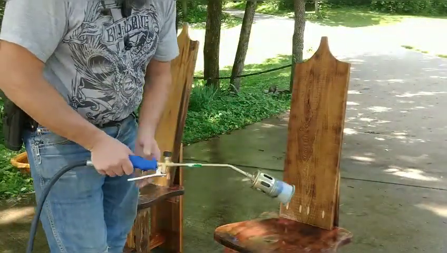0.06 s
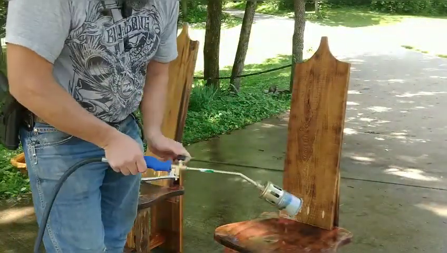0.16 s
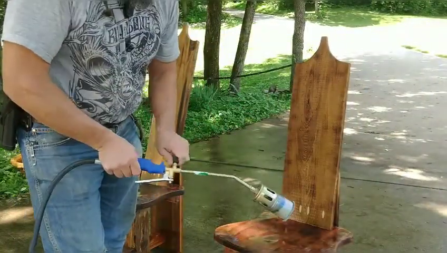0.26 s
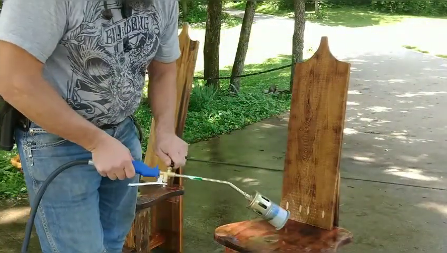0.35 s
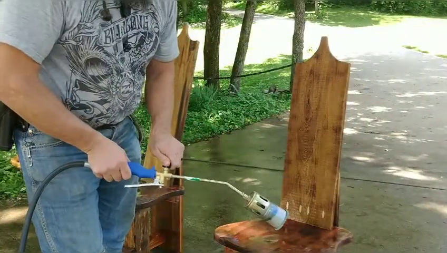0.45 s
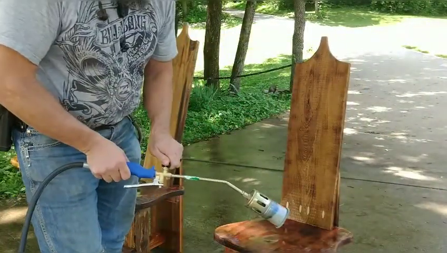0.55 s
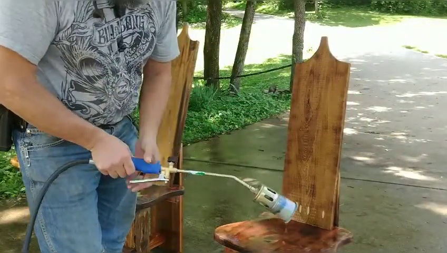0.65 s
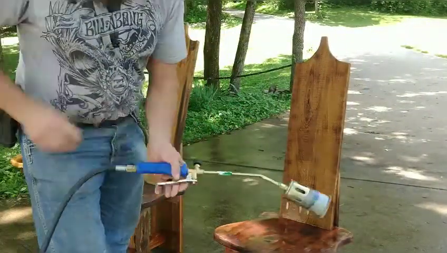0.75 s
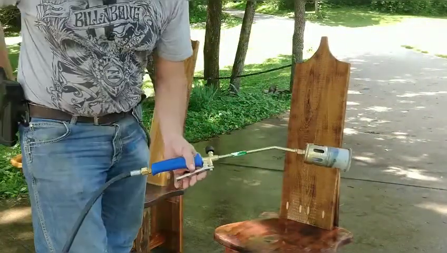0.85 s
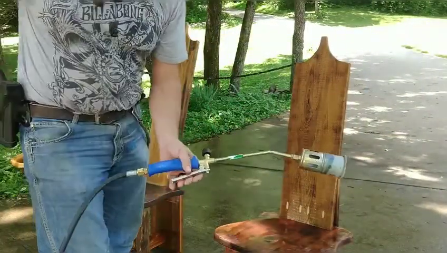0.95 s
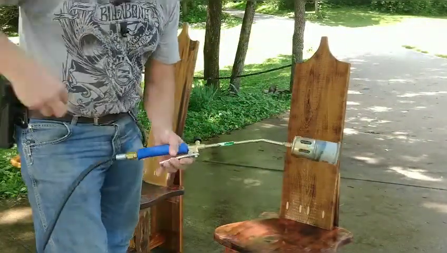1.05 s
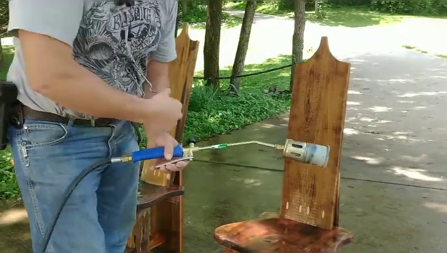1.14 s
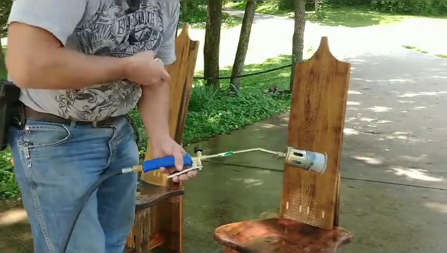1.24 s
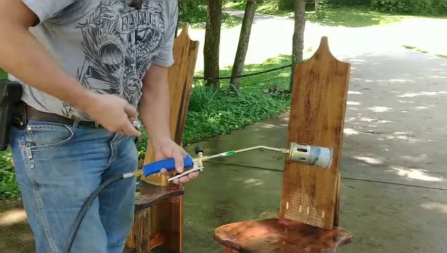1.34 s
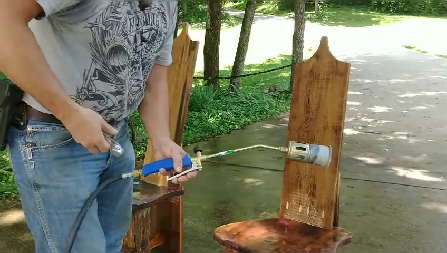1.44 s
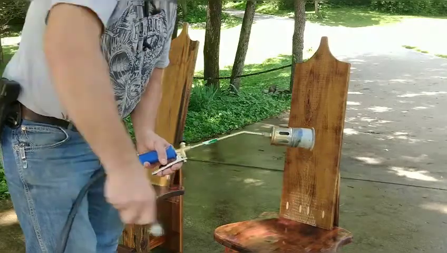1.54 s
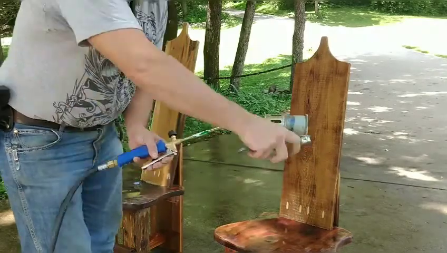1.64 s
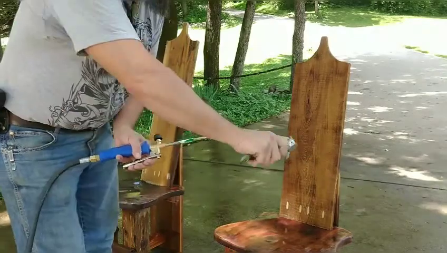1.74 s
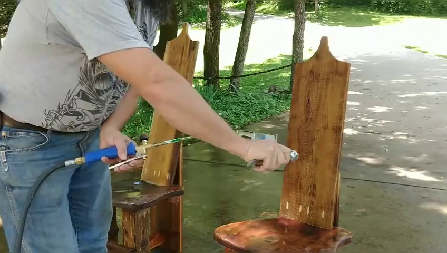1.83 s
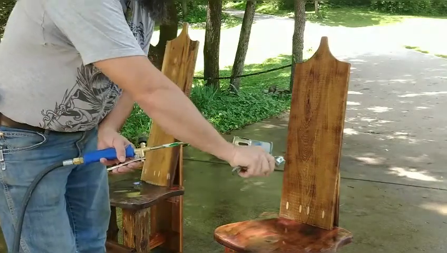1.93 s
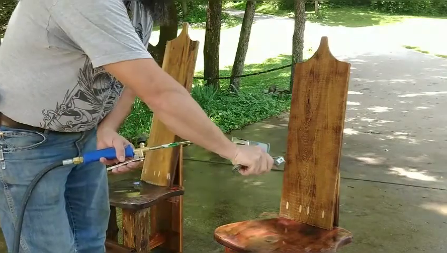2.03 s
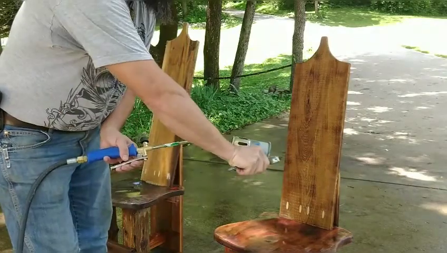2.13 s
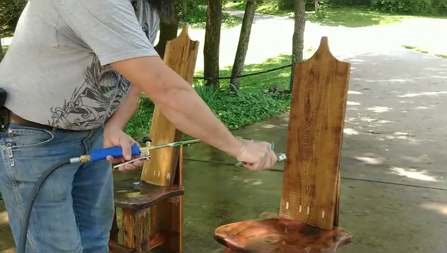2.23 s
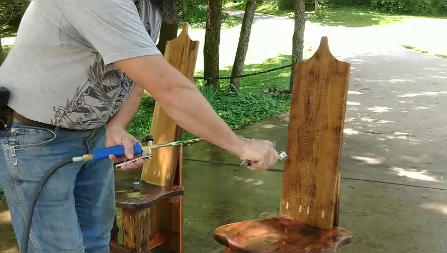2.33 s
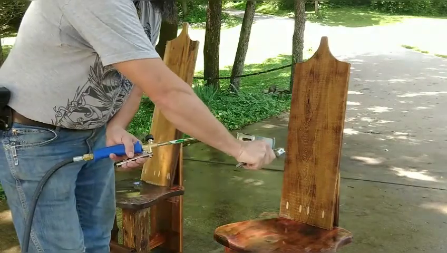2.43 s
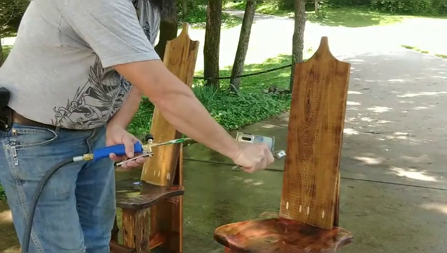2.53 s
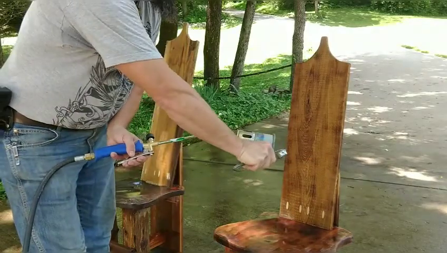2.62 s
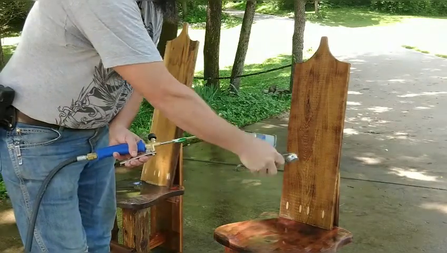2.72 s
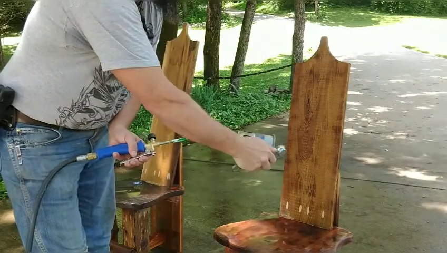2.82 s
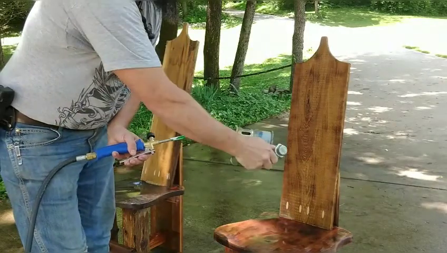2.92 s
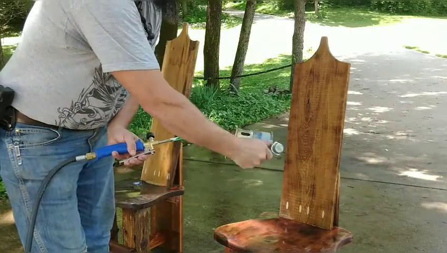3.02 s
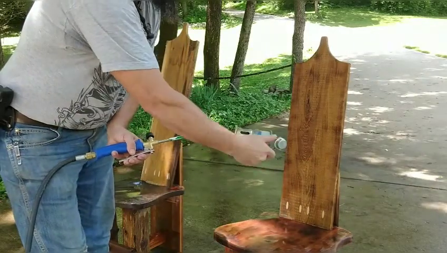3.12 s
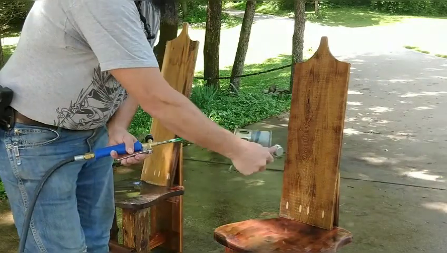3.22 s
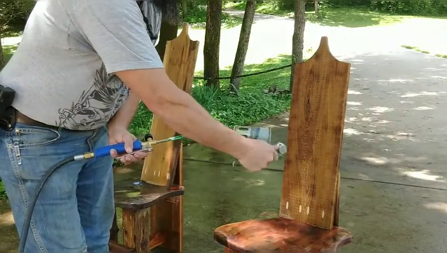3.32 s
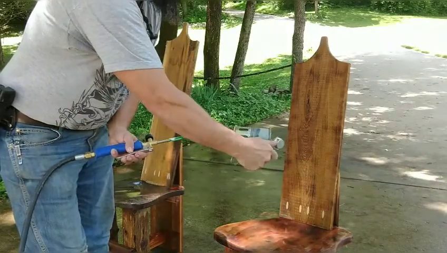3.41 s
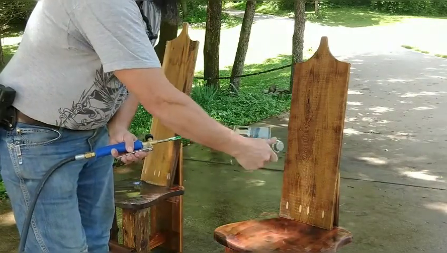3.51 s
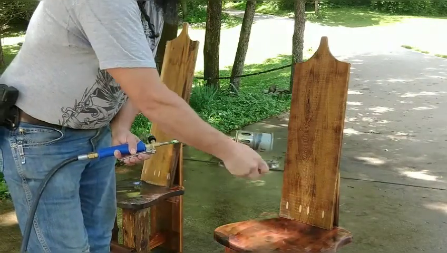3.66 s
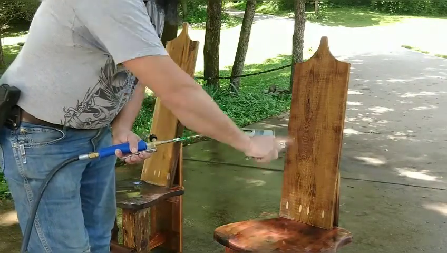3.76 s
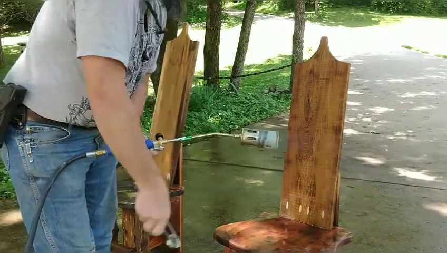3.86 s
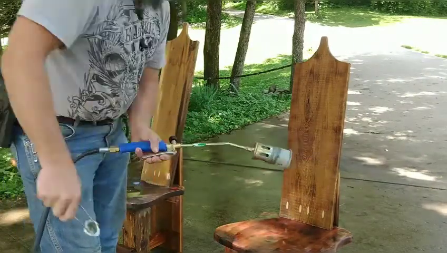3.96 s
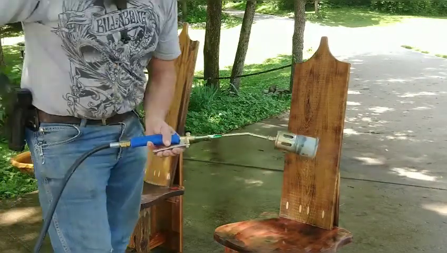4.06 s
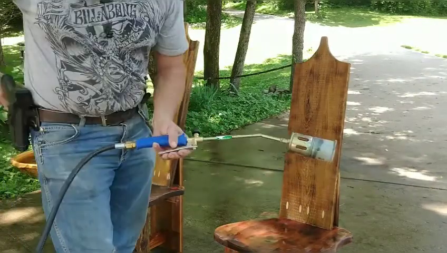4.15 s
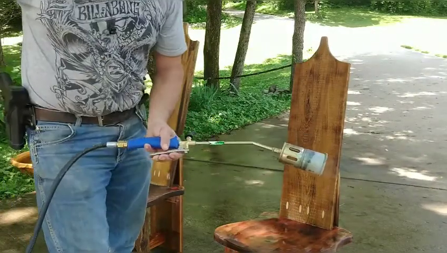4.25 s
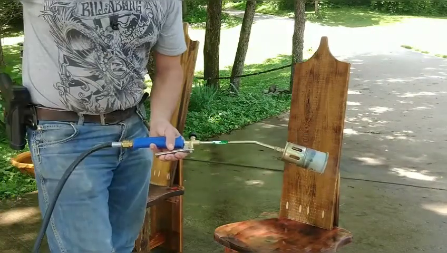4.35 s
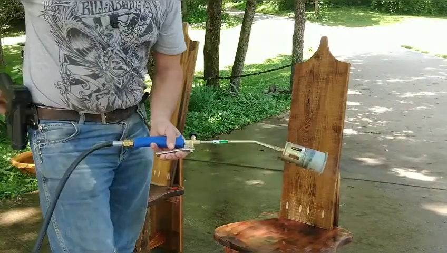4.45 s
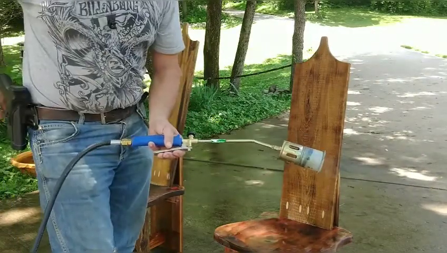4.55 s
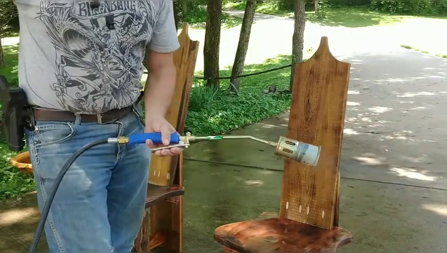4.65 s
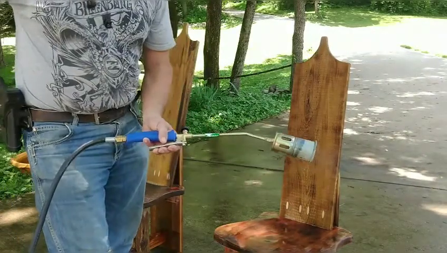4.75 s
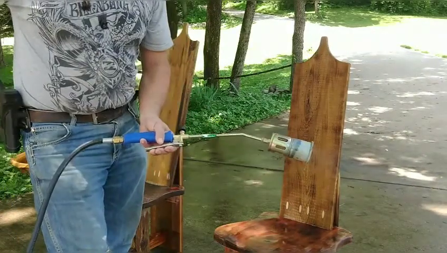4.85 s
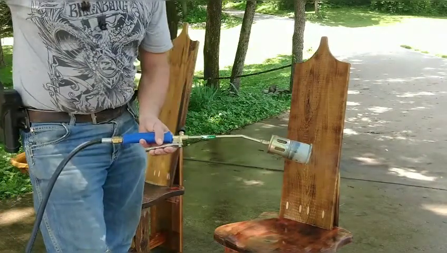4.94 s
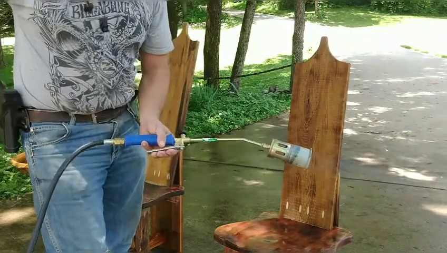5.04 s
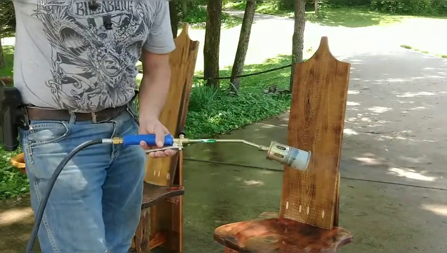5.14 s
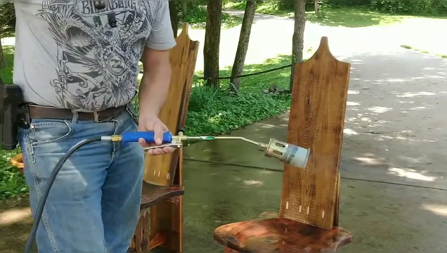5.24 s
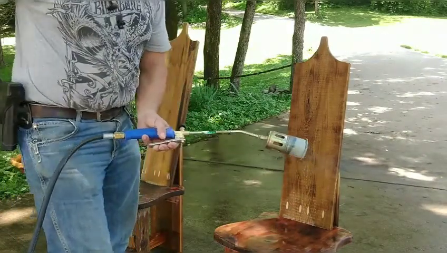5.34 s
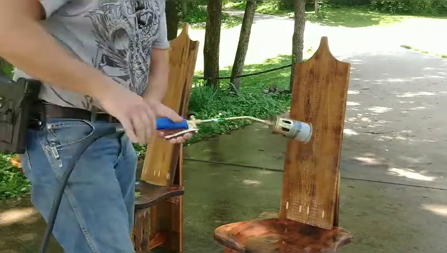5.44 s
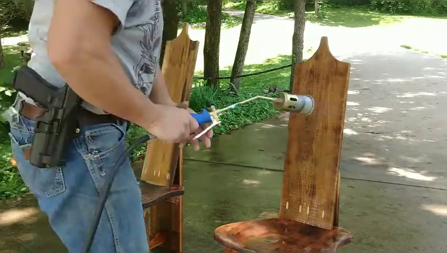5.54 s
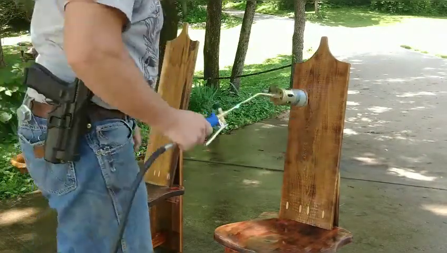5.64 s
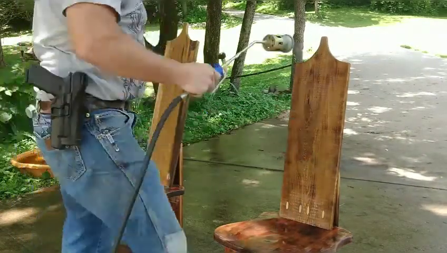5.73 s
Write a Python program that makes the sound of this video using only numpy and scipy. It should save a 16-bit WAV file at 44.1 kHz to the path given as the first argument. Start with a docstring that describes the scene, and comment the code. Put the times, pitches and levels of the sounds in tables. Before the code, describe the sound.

Close, dry outdoor sound in stereo. From 0 to 0.3 seconds a strong blast of unlit gas rushes through a burner cup, hollow and breathy around a midrange pitch, with harsh spray and low air thumps. It shuts off sharply, leaving near quiet until 0.43, when a softer flow opens with a brief spurt and settles into a steady hollow hiss with fine high sizzle. Low puffs buffet the microphone irregularly until about 1.8. From 2.18 a flint striker works: gritty drags and sharp metallic snaps near 2.2, 2.36, 2.7, 2.97, 3.43, 3.56 and 3.81, some squeaky, with a thin spring ring after 2.2 and 2.97. A tiny pop comes at 2.71. At 3.84 the gas catches; the hollow tone gives way to a low fluttering roar with brighter rush and light crackle, two stronger pops near 4.4, then steady burning, easing slightly after 5.55.

```python
"""A large propane torch, hand-held over a concrete drive. A blast of unlit gas is shut off, then a gentler flow
hisses as shaped noise and resonates in the burner cup while a flint striker is scraped: gritty bursts ring
its metal, and its spring twangs. The gas catches and burns with a roar of fluttering low noise, a brighter
rush and small pops. A sliding ground echo colours cup and flame; puffs of air buffet the microphone
over a faint open-air background."""
import sys
import numpy as np
from scipy import signal
from scipy.fft import rfft, irfft, next_fast_len
from scipy.io import wavfile
from scipy.ndimage import uniform_filter1d

SR = 44100
rng = np.random.default_rng(int(sys.argv[2]) if len(sys.argv) > 2 else 0)


def master_out(mix):
    """Clip the mix to full scale and print it as 16-bit PCM to the path in sys.argv[1]."""
    frames = np.transpose(np.atleast_2d(mix))
    ceiling = np.clip(frames, -1, 1)
    pcm = np.round(ceiling * 32767).astype(np.int16)
    wavfile.write(sys.argv[1], SR, pcm)


N = 254898
TIME, FREQS = np.arange(N) / SR, np.arange(N // 2 + 1) * SR / N

# The valve shuts, reopens, and the gas catches.
SHUT_S, OPEN_S, LIT_S = 0.3005, 0.431, 3.8355

# The opening blast: the cup swells once and falls back, while the jet sags steadily.
BLAST_CUP_DB, BLAST_SWELL_DB = -33, 3
BLAST_HISS_DB, BLAST_SIZZLE_DB, BLAST_SAG_DB_PER_S = -46, -50, 11
# The gentle flow: the cup fills up, then slowly loses level.
FILL_S, TRICKLE_CUP_DB, TRICKLE_SAG_DB_PER_S = 0.066, -38, 0.9
FIRST_SHARE = 0.053  # of its filled amplitude, as soon as the valve opens
# As the valve reopens, the sizzle rises and the hiss overshoots in a short spurt.
JET_RISE_S, SPURT_S, SPURT_LENGTH_S, SPURT_DB = .03, 0.524, 0.16, 6
# Heavy gas displaces the air in the cup, so its pitch starts sharp and sinks (shares of the pitch).
CUP_SHARP, CUP_SINK_PER_S = .018, .009
# The cup's pitch wavers as the jet flaps inside it (rms share of the pitch, rate).
CUP_WAVER, CUP_WAVER_HZ = .018, 6
# Air column of the burner cup. One row: frequency in Hz, width in Hz, relative level in dB.
CUP_AIR_COLUMN = (1365, 134, 0)
# Broad hollow tone of the cup. Each row: frequency in Hz, relative level in dB per Hz.
CUP_SPECTRUM = [(60, -44), (230, -35.5), (340, -34.5), (480, -26), (700, -17.5), (1000, -13.5),
                (1200, -5.5), (1370, 2), (1520, -2.5), (1700, -10.5), (2100, -19.5), (2800, -44),
                (4200, -46), (6000, -61.5)]
# Hiss of the gas jet. Each row: frequency in Hz, relative level in dB per Hz.
HISS_SPECTRUM = [(1500, -13.5), (3300, -9), (4300, -9.5), (5900, -19.5), (7200, -6), (7700, -6.5),
                 (8150, 7.5), (8600, 0.5), (9300, -9), (10000, -3), (10700, -1), (11500, -8.5),
                 (12100, -16), (14000, -23)]
# Topmost sizzle of the jet. Each row: frequency in Hz, relative level in dB per Hz.
SIZZLE_SPECTRUM = [(11000, -33), (12300, -17), (13000, -18), (14000, -13), (14350, -11), (14750, -9),
                   (15400, -19), (16000, -24.5)]
# Harsher spray of the blast. Each row: frequency in Hz, relative level in dB per Hz.
SPRAY_SPECTRUM = [(1200, -24), (2000, 11), (2600, 1.5), (3400, -1.5), (4400, -12), (6000, -13.5),
                  (10000, -19), (15000, -23)]
# Hiss as the torch is turned about. Each row: time in seconds, level in dB ahead of a trim.
HISS_CURVE = [(0.66, -57), (1.33, -58), (1.77, -54.5), (1.92, -57), (3.42, -58), (4.09, -54), (5.46, -56.5),
              (5.75, -57)]
# Sizzle as the torch is turned about. Each row: time in seconds, level in dB ahead of a trim.
SIZZLE_CURVE = [(0.62, -61), (0.69, -61), (1.35, -59.5), (1.72, -66), (4.15, -64.5), (4.38, -61),
                (5.41, -64), (5.75, -65)]
HISS_TRIM_DB, SIZZLE_TRIM_DB = 2.0, 4.0
# The gentle flow swells and dips in the cup. Each row: centre in seconds, length in seconds, change in dB.
CUP_GULPS = [(.535, 0.05, -3), (.84, .16, 0.5), (1.42, 0.21, 1), (1.78, .3, 1), (2.28, 0.059, -2),
             (2.57, 0.068, 3), (3.72, .14, -1)]

# The flame's rush fades once the torch is swung up and away.
RUSH_DB, LIFT_S, LIFT_FADE_DB_PER_S = -37.5, 5.56, 12
# Low roar of the flame. Each row: frequency in Hz, relative level in dB per Hz.
ROAR_SPECTRUM = [(20, -49), (45, -24), (90, -5), (170, -0.5), (220, 1), (270, -1.5), (330, -3), (400, 0.5),
                 (480, -3.5), (590, 0.5), (670, -2.5), (900, -3.5), (1200, -7), (2000, -27), (3000, -60)]
# Brighter rush of the flame. Each row: frequency in Hz, relative level in dB per Hz.
RUSH_SPECTRUM = [(600, -21), (1100, -3), (1500, 1.5), (2000, -0.5), (2400, -12), (2900, -16), (3800, -23.5),
                 (5000, -28.5), (8000, -23.5), (14000, -37)]
# The roar catches, falters and builds. Each row: time in seconds, level in dB ahead of the surges.
ROAR_CURVE = [(3.84, -32.5), (3.93, -34), (4.0, -34.5), (4.1, -34), (4.14, -31), (4.26, -31.5), (4.4, -33),
              (4.51, -30.5), (4.56, -31), (4.7, -31), (4.78, -32), (4.92, -32), (4.97, -31), (5.3, -31.5),
              (5.46, -33.5), (5.55, -31), (5.78, -35)]
# The flame flares up briefly. Each row: centre in seconds, length in seconds, rise in dB.
FLAME_SURGES = [(3.93, 0.1, 3), (4.055, 0.052, 1), (4.378, 0.18, 2.5)]
# Pockets of gas that go off with a pop. Each row: time in seconds, peak in dB ahead of the ground echo.
GAS_POPS = [(2.7128, -42.5), (4.373, -19.5), (4.402, -21)]
# Lag of the ground echo as the torch is moved. Each row: time in seconds, lag in milliseconds.
GROUND_LAG = [(0, 2.9), (.5, 2.55), (1, 3.25), (1.4, 3.1), (1.75, 3.5), (2.2, 3.12), (3.7, 3.12),
              (4.05, 3.0), (4.3, 3.28), (5.3, 3.16), (5.78, 3.33)]

SNAP_ATTACK_S, SNAP_RELEASE_S = .0005, .002
FRAME_WIDTH_HZ, SQUEAL_WIDTH_HZ = 180, 140
SPRING_HZ = 2720
# Resonances of the striker's file and hood. Each row: frequency in Hz, width in Hz, relative level in dB.
FILE_MODES = [(2900, 900, -12), (4200, 500, -12), (5300, 500, -13), (6160, 90, 1), (7000, 70, -8),
              (7900, 550, -2), (8280, 300, 0), (9190, 160, 0), (10780, 700, -10), (12400, 200, -6),
              (14000, 2500, -14)]
# The flint snaps across the file. Each row: start in seconds, length in seconds, rasp level in dB,
# clack level in dB, frame pitch in Hz as the grip shifts it, squeal level in dB, squeal pitch in Hz.
FLINT_SNAPS = [(2.1765, .008, -44, -47, 3300, -44, 6120), (2.180, .008, -54, -56, 3300, -43, 9250),
               (2.185, .008, -58, -60, 3300, -48, 6120), (2.2365, .005, -50, -39, 3470, -49, 6080),
               (2.359, .005, -60, -40.5, 3600, -54, 9200), (2.365, .0015, -54, -36, 3650, -48, 9200),
               (2.3672, .007, -48, -56, 3700, -41.5, 9200), (2.6933, .002, -49, -42, 3400, -51, 8100),
               (2.706, .012, -40, -48, 3600, -37.5, 9150), (2.973, .011, -43, -48, 3800, -43, 7020),
               (2.984, .009, -54, -48, 3800, -50, 8280), (3.4245, .003, -52, -45.5, 3780, -45, 9130),
               (3.4295, .004, -48, -40, 3800, -44, 8100), (3.558, .005, -57, -46, 3720, -60, 8250),
               (3.565, .003, -57, -48, 3720, -60, 8250), (3.809, .009, -50, -52, 3500, -55, 6160)]
# The flint drags slowly before it snaps. Each row: start in seconds, length in seconds, level in dB.
FLINT_DRAGS = [(2.295, .035, -56), (2.328, .036, -54), (2.635, .05, -56), (2.696, .013, -50.5),
               (2.908, .034, -50.5), (2.937, .036, -51.5), (3.085, .04, -56), (3.396, .032, -51),
               (3.498, .02, -57)]
# The flint jumps a tooth. Each row: time in seconds, strength in dB of the click that excites the hood.
FLINT_TICKS = [(2.1778, -30), (2.1822, -28), (2.2372, -31), (2.3672, -22), (2.6936, -30), (2.7078, -27),
               (2.7163, -29), (2.9732, -29), (2.981, -29), (3.4315, -32)]
# A tick rings the hood broadly. Each row: frequency in Hz, width in Hz, relative level in dB.
HOOD_MODES = [(3400, 900, -4), (7700, 1200, 0), (9200, 900, 0)]
# The frame rings loosely under the drags. One row: frequency in Hz, width in Hz, relative level in dB.
LOOSE_FRAME_MODE = (3400, 1000, 0)
LOOSE_FRAME_DB = -2.5
# The wire spring is plucked or jolted, and damped by the hand.
# Each row: time in seconds, level in dB, time to fall by 60 dB in seconds.
SPRING_TWANGS = [(2.202, -46.5, .62), (2.237, -56, .25), (2.694, -47, .09), (2.972, -50, .6)]

# A wavering breeze on top of a steady weak draught dies away.
BREEZE_DB, CALM_DB, CALM_S, CALMING_S = -64, -61.5, 1.85, 0.32
EDDY_HZ = 95  # eddy rate at which the puff noise plays at its own pitch
# Low noise of air on the microphone. Each row: frequency in Hz, relative level in dB per Hz.
PUFF_SPECTRUM = [(20, -20), (33, -19), (55, 1), (95, 4.5), (140, -2.5), (220, -14), (350, -24), (700, -26)]
# Puffs of air on the microphone. Each row: start in seconds, length in seconds, level in dB, eddy rate in Hz.
AIR_PUFFS = [(0.007, 0.068, -37, 94.7), (0.068, 0.059, -36.5, 185), (0.121, 0.072, -43.5, 95),
             (0.194, 0.034, -38.5, 95.2), (0.217, 0.058, -52, 85), (0.424, 0.043, -46, 80),
             (0.486, 0.033, -53, 85.2), (0.566, 0.024, -37, 159.7), (0.588, .042, -39, 119.4),
             (0.853, 0.058, -46.5, 110.5), (0.905, 0.06, -40.5, 84.8), (1.014, 0.033, -41, 115),
             (1.048, .045, -43, 89.5), (1.125, 0.023, -42, 169), (1.17, 0.046, -50, 79.6),
             (1.284, 0.031, -37.5, 95.3), (1.33, .035, -54, 100), (1.507, 0.031, -47, 101),
             (1.65, 0.062, -48, 95), (1.747, 0.052, -47.5, 95.4), (1.808, 0.053, -55, 85),
             (1.89, 0.048, -59, 80), (2.123, 0.058, -59, 80.1), (3.116, 0.077, -44.5, 99.5),
             (3.788, 0.043, -48, 75)]
# Open-air background. Each row: frequency in Hz, relative level in dB per Hz.
OUTDOORS_SPECTRUM = [(20, -32), (80, -13), (200, -17), (500, -21), (1500, -31), (2000, -33), (2580, -21),
                     (3100, -29.5), (5000, -34), (8200, -35), (10000, -40), (15000, -40)]
# Stereo image of the sound. Each row: frequency in Hz, left minus right in dB, left lead in radians,
# likeness of the two from 0 to 1.
STEREO_IMAGE = [(85, 4.5, -0.2, 0.95), (140, 2.0, -0.2, 0.96), (220, 2.2, -0.2, 0.96),
                (330, 3.8, -0.25, 0.96), (550, 1.0, 0.0, 0.99), (1450, 0.9, -0.0, 0.995),
                (1800, -3.3, -0.5, 0.88), (2100, -6.6, -2.0, 0.75), (2400, -1.0, -3.2, 0.91),
                (2720, 1.0, -4.6, 0.8), (3050, 3.6, -4.5, 0.52), (3800, -2.7, -6.0, 0.42),
                (4300, -1.4, -9.0, 0.5), (4700, 0.1, -9.4, 0.94), (5000, 0.1, -9.4, 0.97),
                (5450, 3.2, -9.8, 0.12), (6000, 0.4, -12.5, 0.69), (7000, 3.9, -15.0, 0.61),
                (8200, 8.2, -12.1, 0.68), (9400, 3.8, -9.0, 0.51), (10700, 1.0, -12.6, 0.46),
                (12100, 0.2, -15.7, 0.86), (13200, 0.1, -18.8, 0.84), (14200, 1.0, -21.1, 0.48),
                (15200, -0.3, -17.9, 0.34)]
CUTOFF_HZ = 15520


def gas(lit):
    """The jet hisses whenever the valve is open; the cup resonates only while it holds cold gas."""
    blast, flow = 1 - step(SHUT_S, 0.0017), step(OPEN_S, 0.0016)
    blast_cup = blast * from_db(BLAST_CUP_DB + BLAST_SWELL_DB * swell(0.027, 0.26))
    filling = FIRST_SHARE + (1 - FIRST_SHARE) * fill(OPEN_S, FILL_S) ** 2
    trickle = from_db(TRICKLE_CUP_DB - TRICKLE_SAG_DB_PER_S * (TIME - OPEN_S))
    cup = blast_cup + (1 - lit) * flow * swells(CUP_GULPS) * filling * trickle

    sag_db = -BLAST_SAG_DB_PER_S * TIME
    spurt = from_db(SPURT_DB * swell(SPURT_S, SPURT_LENGTH_S))
    hiss = blast * from_db(BLAST_HISS_DB + sag_db)
    hiss = hiss + from_db(HISS_TRIM_DB) * flow * spurt * level(HISS_CURVE)
    sizzle = blast * from_db(BLAST_SIZZLE_DB + sag_db)
    sizzle = sizzle + from_db(SIZZLE_TRIM_DB) * fill(OPEN_S, JET_RISE_S) * level(SIZZLE_CURVE)

    # turbulence fills the cup with a broad hollow sound and blows its air column like a bottle
    column = resonate(rng.standard_normal((2, N)), [CUP_AIR_COLUMN])
    waver = 1 + CUP_SHARP - CUP_SINK_PER_S * TIME + CUP_WAVER * slow_noise(CUP_WAVER_HZ)
    cup_tone = glide(from_db(-1.0) * noise(CUP_SPECTRUM) + from_db(-7) * column, waver)
    hollow = cup * cup_tone * flutter(rate_hz=40, depth_db=0.97)
    # at full pressure the jet tears into a harsher spray
    spray = from_db(-42.0) * blast * noise(SPRAY_SPECTRUM)
    jet = hiss * noise(HISS_SPECTRUM) + sizzle * noise(SIZZLE_SPECTRUM) + spray
    return ground_echo(hollow, strength=0.28) + jet * flutter(rate_hz=22, depth_db=1.4)


def flame(lit):
    """Eddies of burning gas: big ones roar and flutter, small ones rush, and both flare together."""
    flare = lit * swells(FLAME_SURGES)
    big = level(ROAR_CURVE) * evened(noise(ROAR_SPECTRUM), window_s=0.064)
    rush = from_db(RUSH_DB - LIFT_FADE_DB_PER_S * np.maximum(TIME - LIFT_S, 0))
    small = rush * noise(RUSH_SPECTRUM) * flutter(rate_hz=68, depth_db=0.75)
    burning = flare * (big + small) * flutter(rate_hz=32, depth_db=1.17)
    return ground_echo(burning + pops(lit), strength=0.43)


def pops(lit):
    """A pocket of gas flares and collapses: a short pressure pulse; small ones keep crackling in the flame."""
    pops_per_s, pop_s = 25, .0003
    crackle_db = -30.5 + 1.3 * np.clip(rng.standard_normal(N), -2, 2)
    kicks = lit * (rng.random(N) < pops_per_s / SR) * from_db(crackle_db)
    for at_s, db in GAS_POPS:
        kicks[round(at_s * SR)] = from_db(db)
    age = np.arange(-SR // 200, SR // 200) / SR / pop_s
    pulse = -age * np.exp((1 - age ** 2) / 2)  # one swing up and one down, each of height 1
    return signal.fftconvolve(kicks, pulse, "same") * np.array([[1], [0]])


def ground_echo(x, strength):
    """The bounce off the concrete combs the sound, and the comb slides with the torch."""
    late = TIME - np.interp(TIME, *np.transpose(GROUND_LAG)) / 1000
    echo = np.array([np.interp(late, TIME, row) for row in x])
    return (x + strength * echo) / np.sqrt(1 + strength ** 2)


def striker():
    """Flint and spring together."""
    return flint() + spring()


def flint():
    """The flint skips over file teeth: slow gritty drags, then snaps that tick, squeal and clack the frame."""
    teeth_per_s = 2500
    teeth = rng.standard_normal((2, N)) * (rng.random(N) < teeth_per_s / SR)
    # the flint catches and slips
    grit = evened(teeth * flutter(rate_hz=170, depth_db=4.0), window_s=.02)
    drag = grit * sum(from_db(db) * np.sqrt(swell(s, length_s)) for s, length_s, db in FLINT_DRAGS)

    slip, tones, ticks = np.zeros((3, 2, N))
    age = TIME[:SR // 20]
    for s, length_s, rasp_db, clack_db, frame_hz, squeal_db, squeal_hz in FLINT_SNAPS:
        span = round(s * SR) + np.arange(len(age))
        attack = 1 - np.exp(-age / SNAP_ATTACK_S)
        stroke = attack * np.exp(-np.maximum(age - length_s, 0) / SNAP_RELEASE_S)
        bite = evened(teeth[:, span], window_s=.004)
        slip[:, span] += from_db(rasp_db) * stroke * bite
        clack = from_db(clack_db) * sing(bite, frame_hz, FRAME_WIDTH_HZ)
        squeal = from_db(squeal_db) * sing(bite, squeal_hz, SQUEAL_WIDTH_HZ)
        tones[:, span] += stroke * (clack + squeal)
    for s, db in FLINT_TICKS:
        ticks[0, round(s * SR)] = from_db(db)

    scrape = resonate(drag + slip, FILE_MODES)
    loose_frame = from_db(LOOSE_FRAME_DB) * resonate(drag, [LOOSE_FRAME_MODE])
    return tones + scrape + loose_frame + resonate(ticks, HOOD_MODES)


def spring():
    """The striker's wire spring rings on each time it is let go, buzzing against the frame."""
    ring = 0
    for s, db, t60_s in SPRING_TWANGS:
        ring = ring + fill(s, .002) * from_db(db - 60 * np.abs(TIME - s) / t60_s)
    # the hand on the spring makes its pitch and level waver
    pitch_hz = SPRING_HZ + 3 * slow_noise(rate_hz=60)
    buzz = flutter(rate_hz=90, depth_db=2.1)
    return ring * np.sin(2 * np.pi * np.cumsum(pitch_hz) / SR) * buzz * np.array([[1], [0]])


def breeze():
    """Lumps of low noise push on the left channel while they pull, more weakly, on the right."""
    pushes = [(from_db(db) * swell(s, length_s), hz) for s, length_s, db, hz in AIR_PUFFS]
    gusting = (1 - step(CALM_S, CALMING_S)) * flutter(rate_hz=12.0, depth_db=2.0)
    draught = from_db(CALM_DB) + from_db(BREEZE_DB) * gusting
    strength = draught + sum(push for push, hz in pushes)
    # each puff pulls the eddy rate towards its own
    eddy_hz = (draught * EDDY_HZ + sum(push * hz for push, hz in pushes)) / strength
    # the low rumble is turned down between the valve's shutting and reopening
    gap_gain = 1 - 0.67 * step(SHUT_S, .01) * (1 - step(OPEN_S, .002))
    rumble = evened(glide(noise(PUFF_SPECTRUM), eddy_hz / EDDY_HZ), window_s=.025)
    eddies, stray = strength * gap_gain * rumble
    return np.array([eddies, -from_db(-4.5) * eddies + from_db(-13.0) * stray])


def outdoors():
    """Faint open-air noise, with a low, wavering drone of narrow-band noise from the valve's reopening on."""
    drone_spectrum = [(60, -40), (100, -30), (120, 10), (145, -15), (240, -43)]  # Hz, relative dB per Hz
    drone = from_db(-77.5) * noise(drone_spectrum) * step(OPEN_S, .002)
    return from_db(-77.0) * noise(OUTDOORS_SPECTRUM) + drone


def stereo(x):
    """Level balance, phase lead and likeness of left and right vary by frequency."""
    size = next_fast_len(N + SR // 10)
    hz, *columns = np.transpose(STEREO_IMAGE)
    balance_db, lead, likeness = (np.interp(np.fft.rfftfreq(size, 1 / SR), hz, c) for c in columns)
    likeness = np.clip(likeness, 0, .999)
    # row 0 feeds both channels alike, row 1 in opposition
    common, apart = rfft(x, size) * np.sqrt([(1 + likeness) / 2, (1 - likeness) / 2])
    tilt = from_db(balance_db / 2)
    left = (common + apart) * tilt * np.exp(.5j * lead)
    right = (common - apart) / tilt * np.exp(-.5j * lead)
    even_power = np.sqrt((tilt ** 2 + tilt ** -2) / 2)
    return irfft(np.array([left, right]) / even_power, size)[:, :N]


def from_db(db):
    """Decibels to gain."""
    return 10 ** (np.asarray(db) / 20)


def rms_one(x):
    """Scale to unit rms."""
    return x / np.sqrt(np.mean(x ** 2) + 1e-20)


def noise(spectrum):
    """Two unrelated noises with the given spectrum; rms 1."""
    hz, db = np.transpose(spectrum)
    shape = from_db(np.interp(np.log(FREQS + 1), np.log(hz), db, right=-120))
    return rms_one(irfft(rfft(rng.standard_normal((2, N))) * shape, N))


def slow_noise(rate_hz):
    """A random slow wobble; rms 1."""
    return rms_one(irfft(rfft(rng.standard_normal(N)) / (1 + (FREQS / rate_hz) ** 2), N))


def flutter(rate_hz, depth_db):
    """A randomly wavering gain with unit power."""
    return rms_one(from_db(depth_db * slow_noise(rate_hz)))


def evened(x, window_s):
    """Hold a noise at rms 1 over spans longer than the window."""
    power = uniform_filter1d(x ** 2, max(int(window_s * SR), 1), axis=-1)
    return x / np.sqrt(power + 1e-12)


def glide(x, ratio):
    """Raise or lower all pitches of a noise by a changing ratio."""
    place = np.cumsum(ratio) % N
    return np.array([np.interp(place, np.arange(N), row) for row in x])


def resonate(x, modes):
    """Parallel resonances of alternating sign that keep the power of a white input."""
    z, response = np.exp(-2j * np.pi * FREQS / SR), 0
    for k, (hz, width, db) in enumerate(modes):
        r = np.exp(-np.pi * width / SR)
        poles = 1 - 2 * r * np.cos(2 * np.pi * hz / SR) * z + r * r * z * z
        response = response + (-1) ** k * from_db(db) * (1 - r * r) * (1 - z * z) / poles
    return irfft(rfft(x) * response / np.sqrt(np.mean(np.abs(response) ** 2)), N)


def sing(x, hz, width_hz):
    """One narrow resonance kept ringing by x; rms 1."""
    ringing = signal.lfilter(*signal.iirpeak(hz, hz / width_hz, fs=SR), x)
    return evened(ringing, window_s=.006)


def step(at_s, rise_s):
    """A smooth switch from 0 to 1."""
    return .5 + .5 * np.tanh((TIME - at_s) / rise_s)


def fill(start_s, rise_s):
    """An exponential approach from 0 to 1."""
    return 1 - np.exp(-np.maximum(TIME - start_s, 0) / rise_s)


def swell(start_s, length_s):
    """A half sine of height 1."""
    return np.sin(np.pi * np.clip((TIME - start_s) / length_s, 0, 1))


def swells(rows):
    """Gain from half-sine bumps given as centre in seconds, length in seconds, height in dB."""
    return from_db(sum(db * swell(s - length_s / 2, length_s) for s, length_s, db in rows))


def level(rows):
    """Gain curve from rows of time in seconds and level in dB."""
    return from_db(np.interp(TIME, *np.transpose(rows)))


def scene():
    """Gas, flame and striker in the open air, with a faint return from the surroundings."""
    lit = step(LIT_S, 0.0035)
    torch = gas(lit) + flame(lit) + striker()
    # the return is a short decaying scatter
    age, t60_s = TIME[:SR // 4], .12
    scatter = rng.standard_normal((2, len(age))) * from_db(-60 * age / t60_s)
    scatter /= np.sqrt(np.sum(scatter ** 2, axis=1, keepdims=True))
    surroundings = from_db(-34.5) * signal.fftconvolve(torch, scatter, axes=1)[:, :N]
    return stereo(torch + surroundings + outdoors()) + breeze()


def record(dry):
    """A steep elliptic low-pass cuts off the top."""
    low_pass = signal.ellip(12, .1, 80, CUTOFF_HZ, fs=SR, output="sos")
    return signal.sosfilt(low_pass, dry)


dry = scene()
out = record(dry)
master_out(out)
```